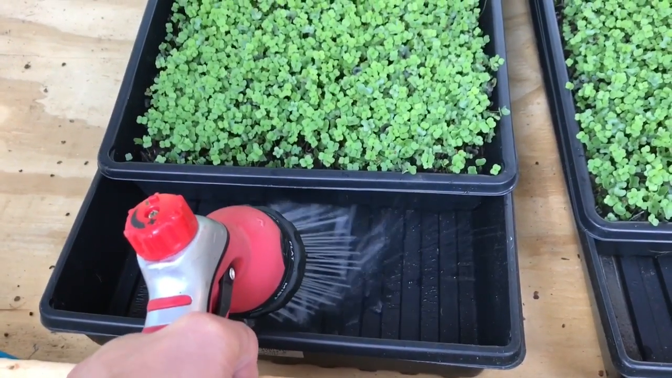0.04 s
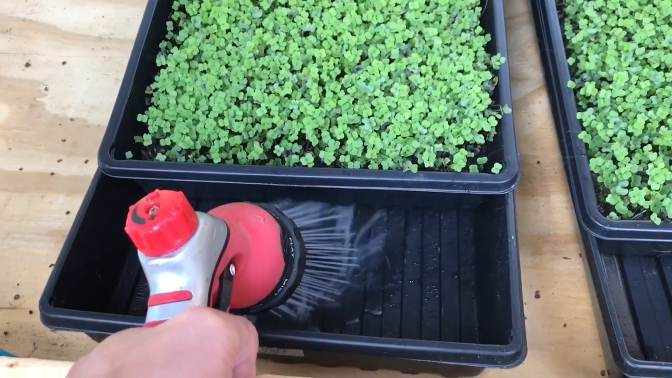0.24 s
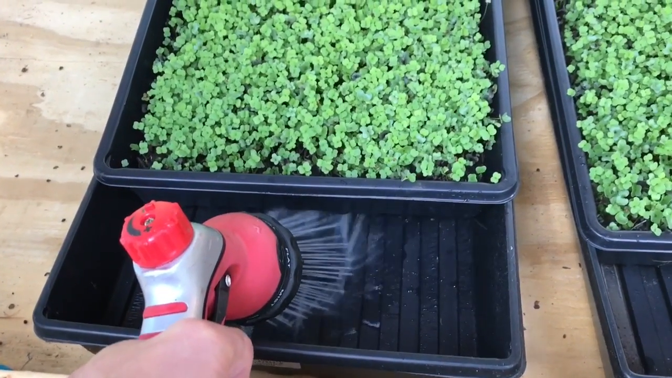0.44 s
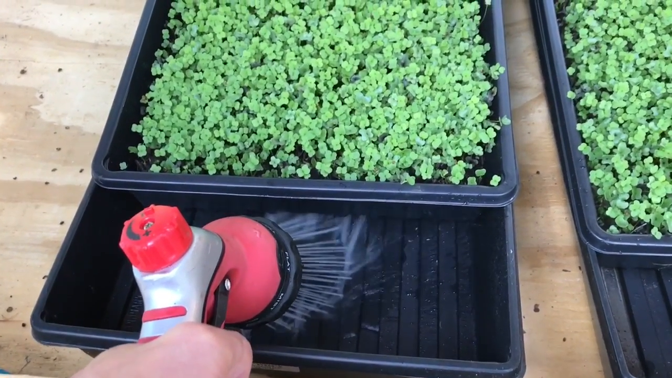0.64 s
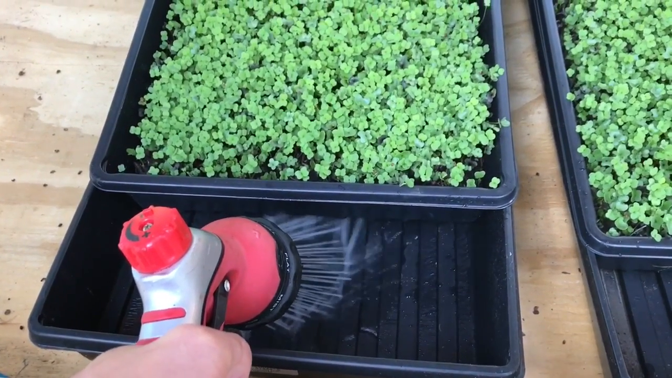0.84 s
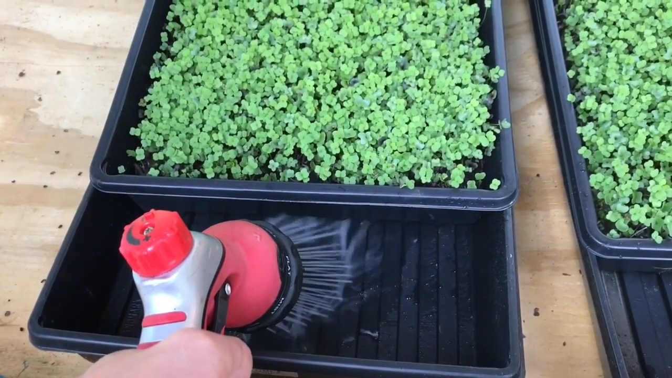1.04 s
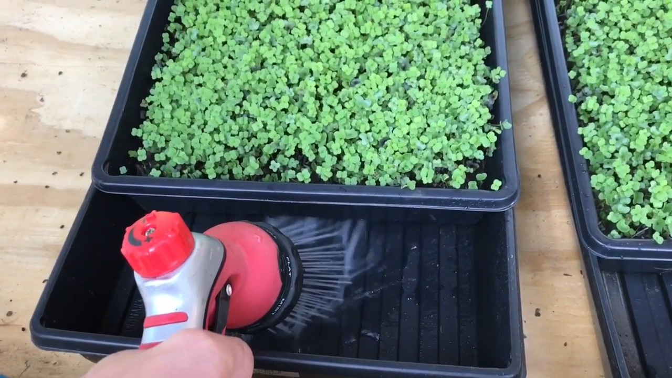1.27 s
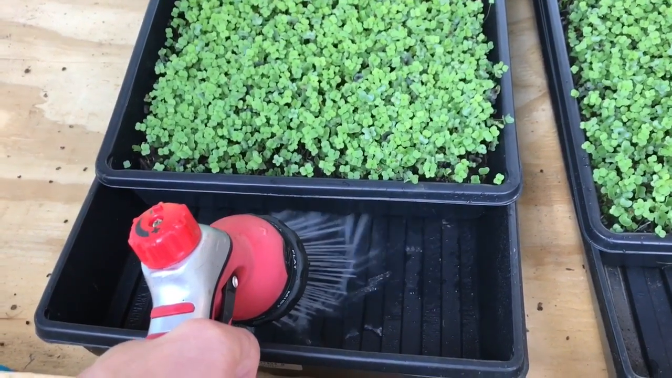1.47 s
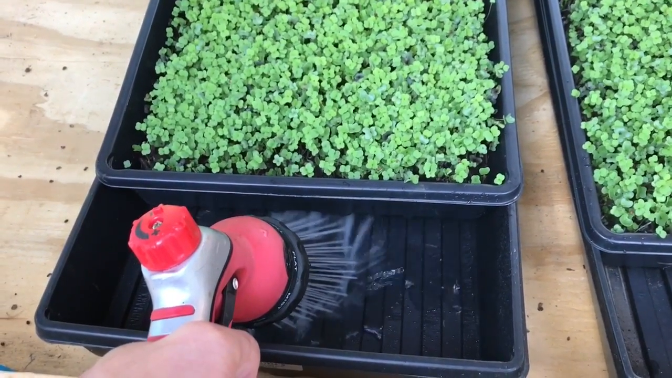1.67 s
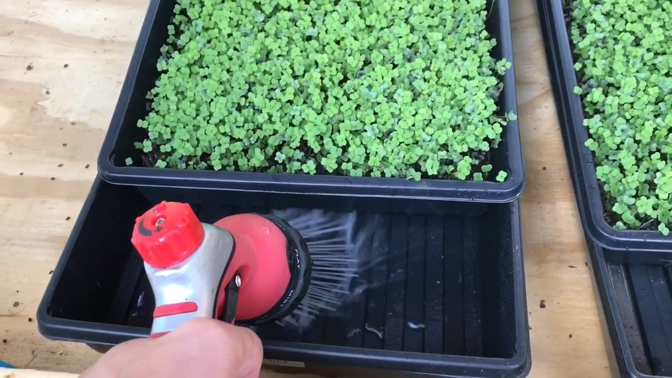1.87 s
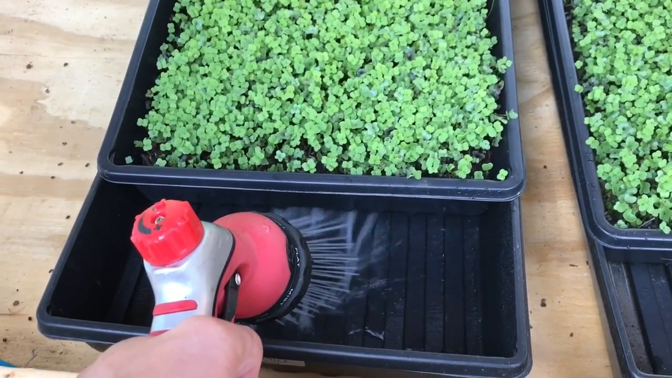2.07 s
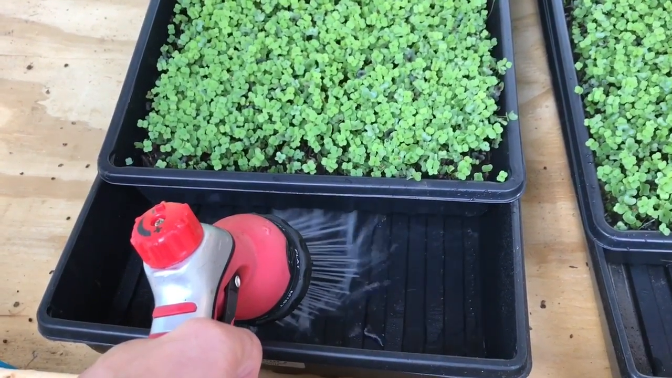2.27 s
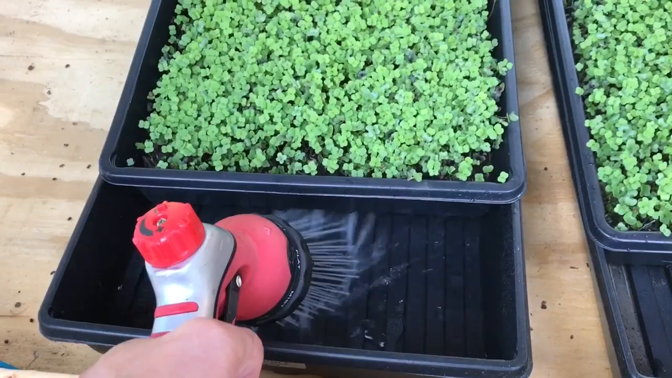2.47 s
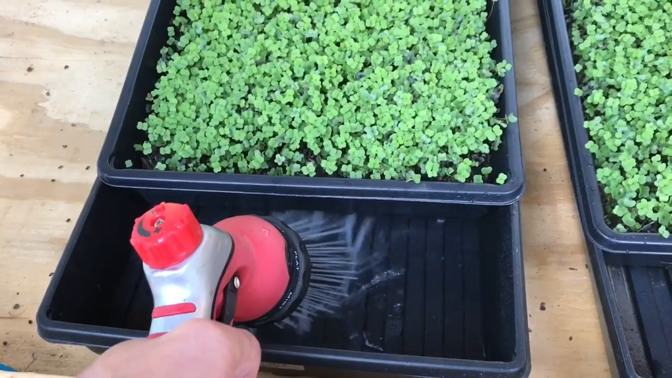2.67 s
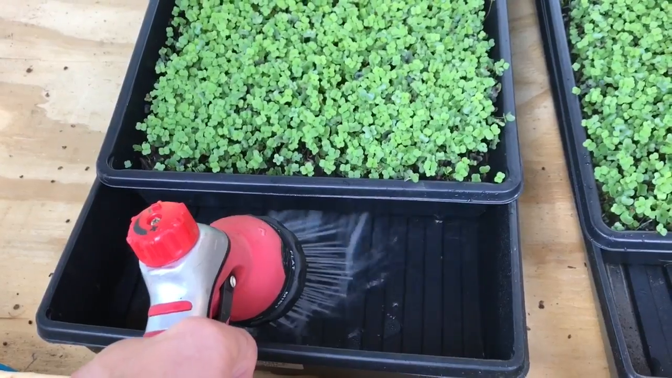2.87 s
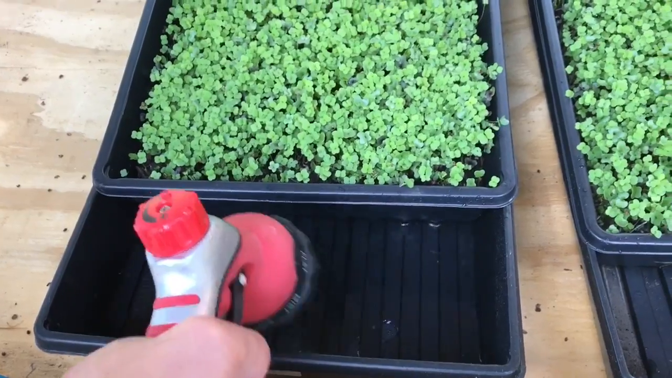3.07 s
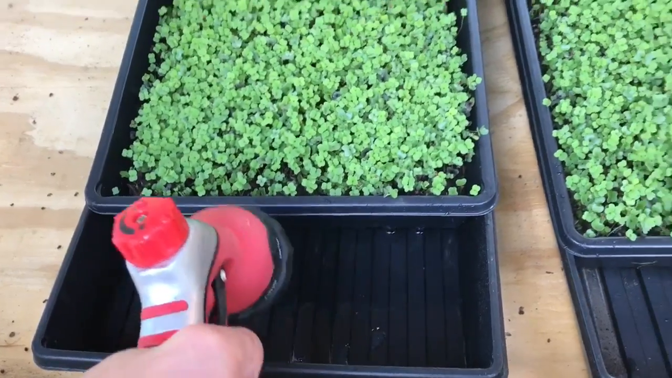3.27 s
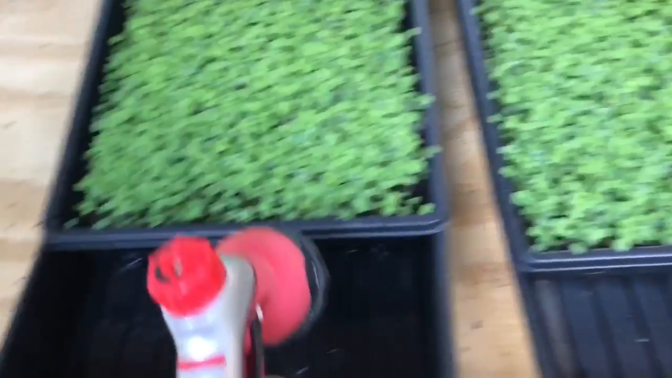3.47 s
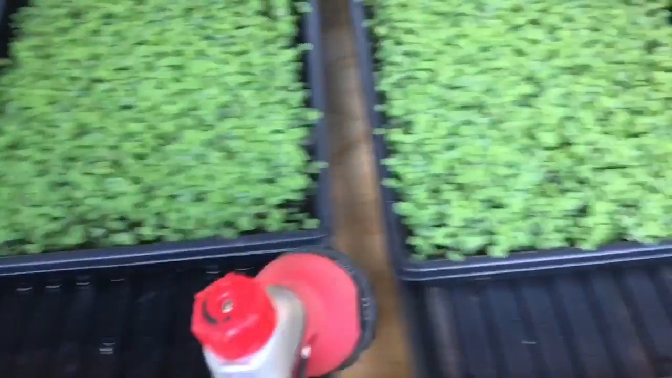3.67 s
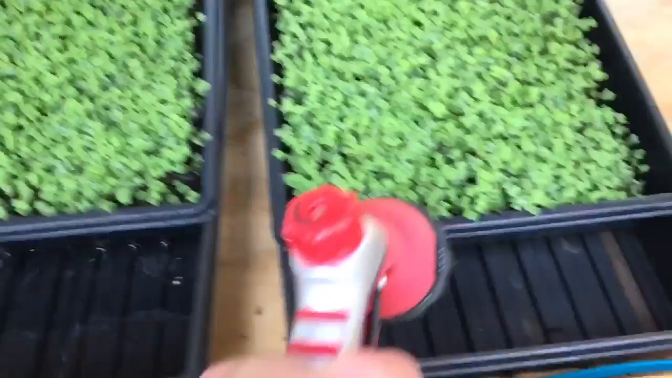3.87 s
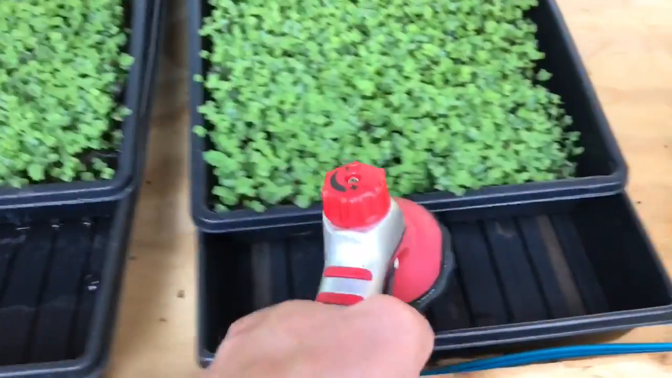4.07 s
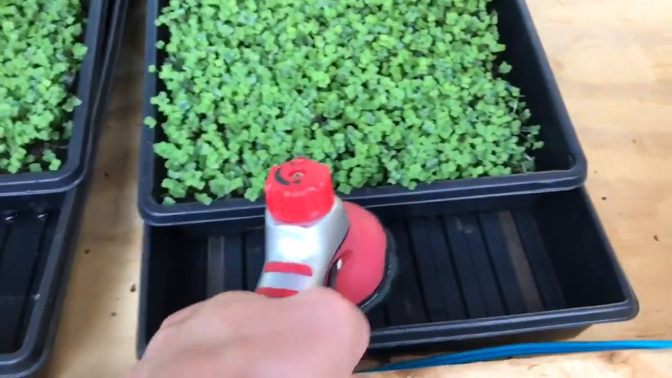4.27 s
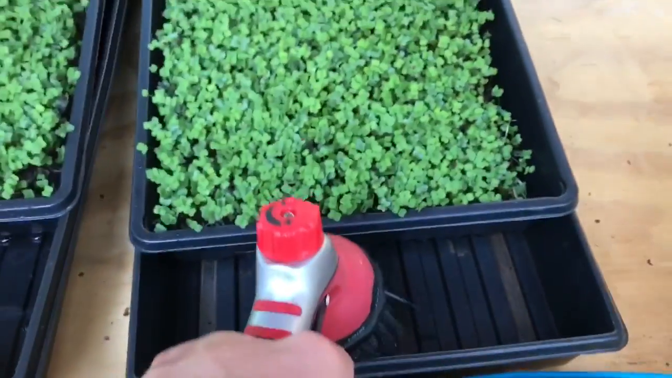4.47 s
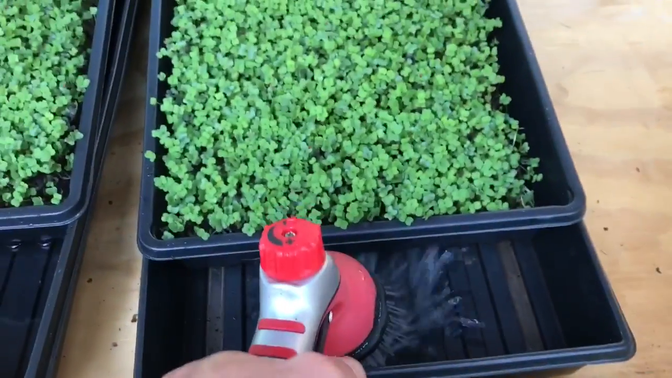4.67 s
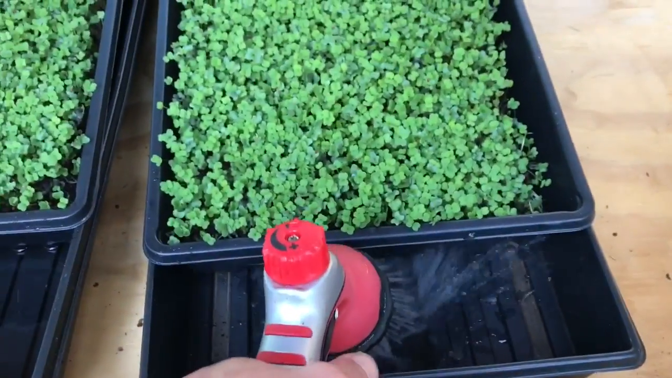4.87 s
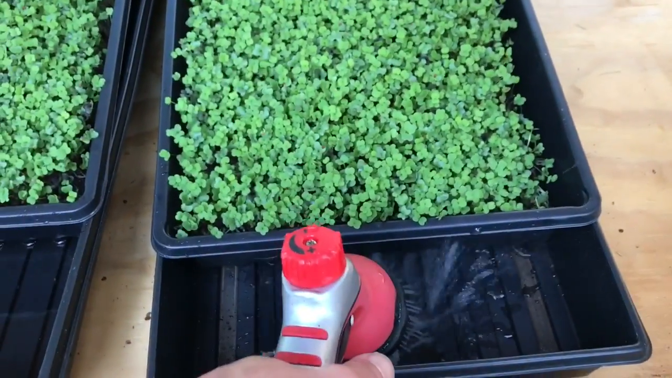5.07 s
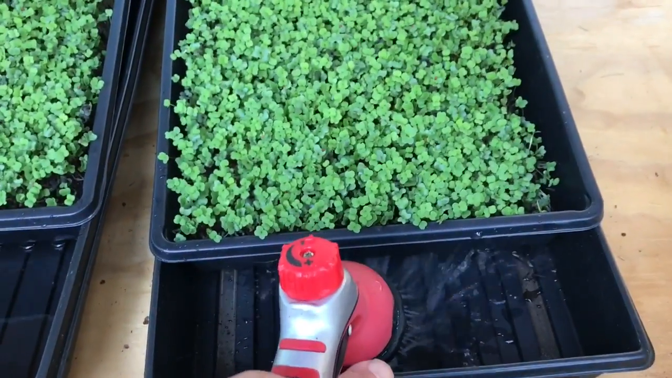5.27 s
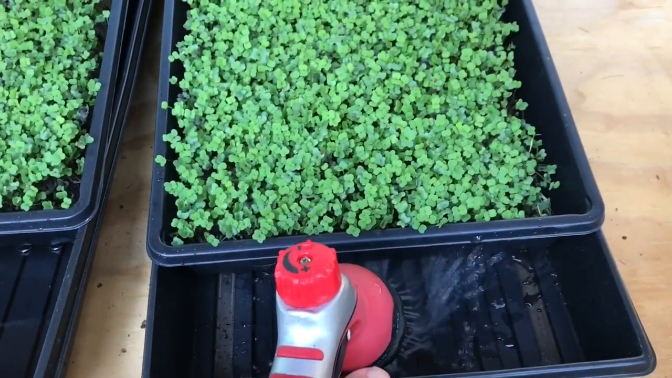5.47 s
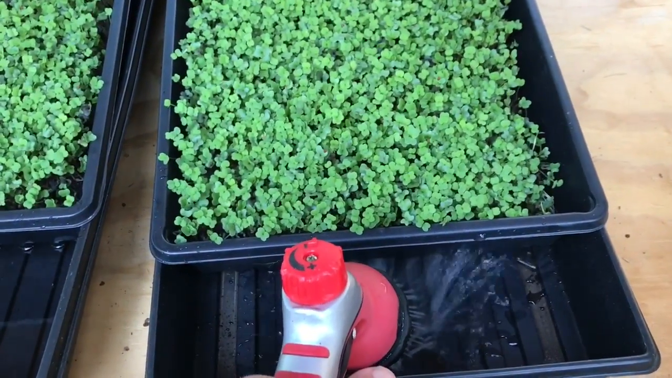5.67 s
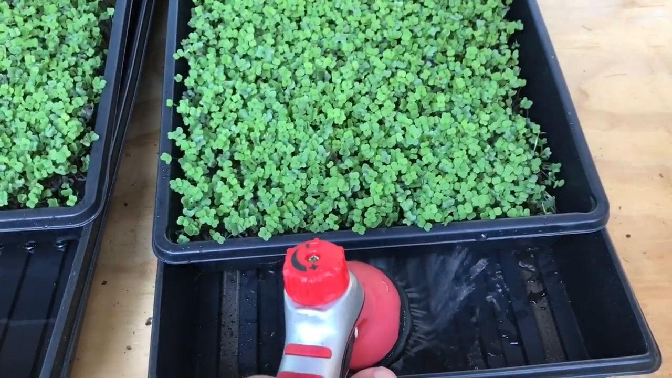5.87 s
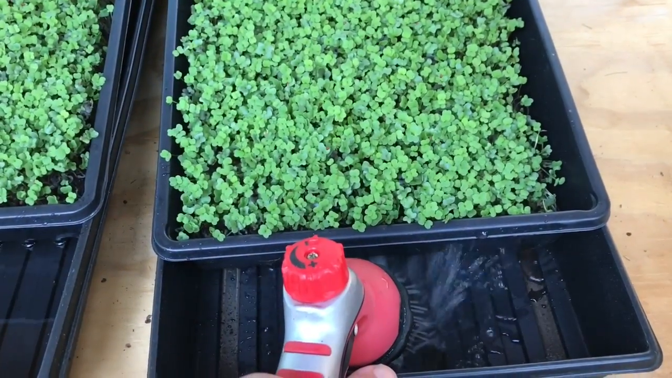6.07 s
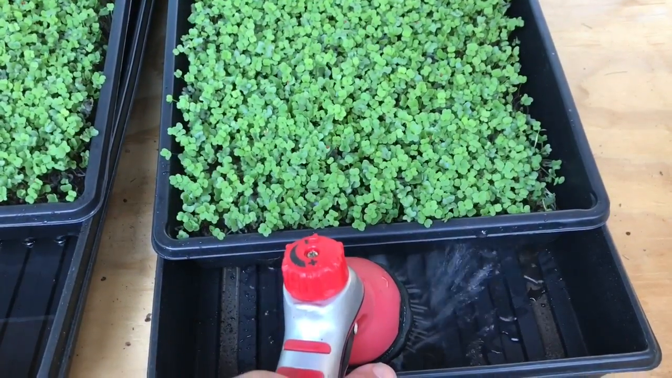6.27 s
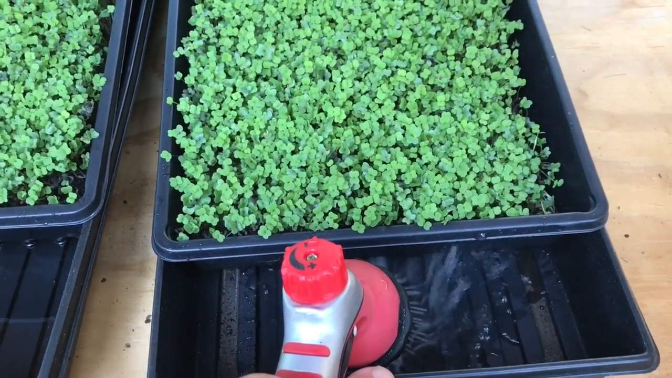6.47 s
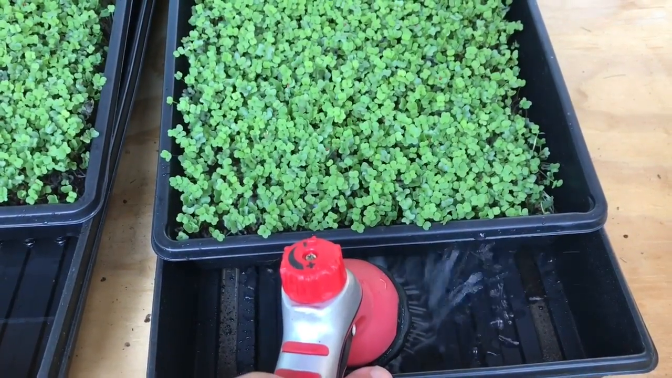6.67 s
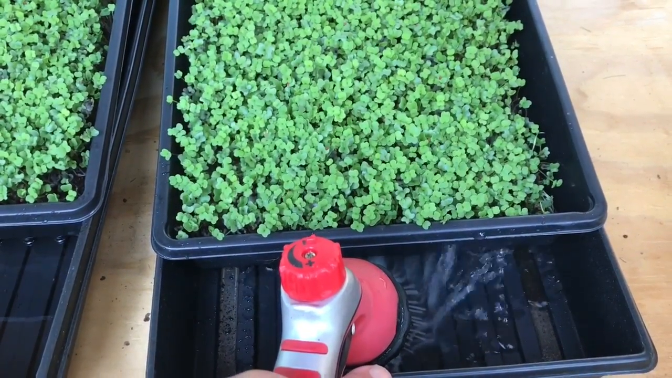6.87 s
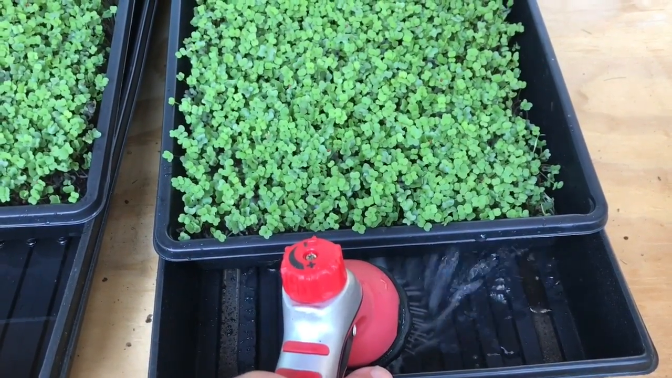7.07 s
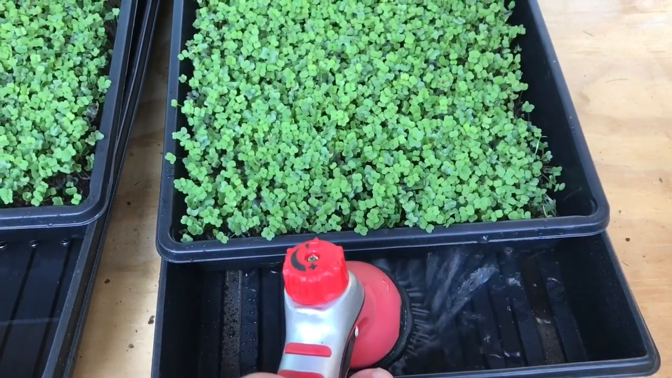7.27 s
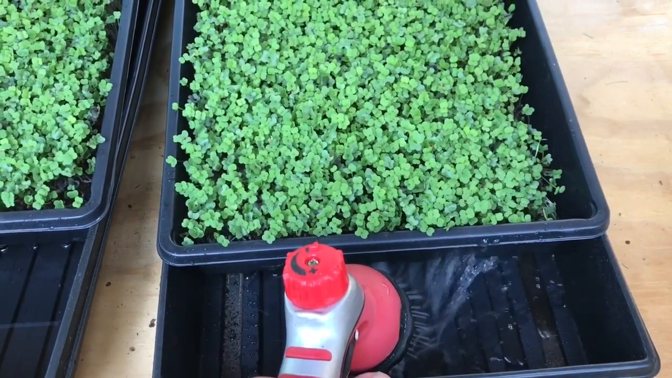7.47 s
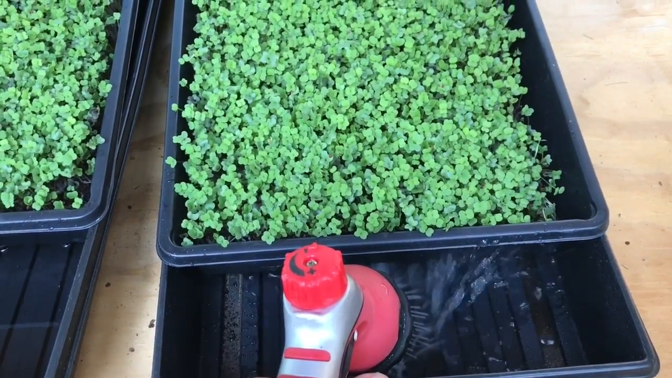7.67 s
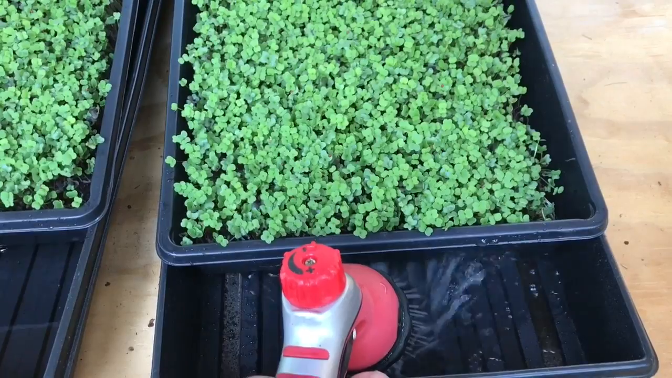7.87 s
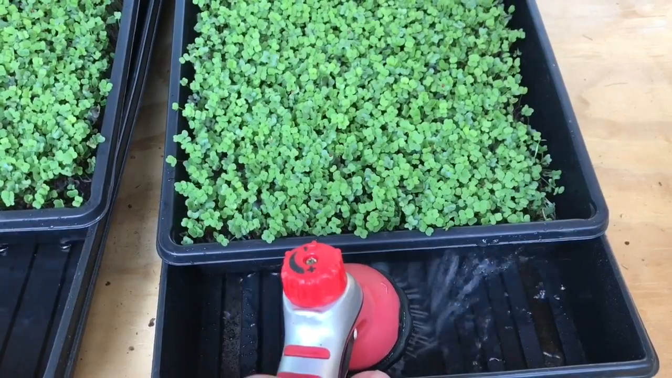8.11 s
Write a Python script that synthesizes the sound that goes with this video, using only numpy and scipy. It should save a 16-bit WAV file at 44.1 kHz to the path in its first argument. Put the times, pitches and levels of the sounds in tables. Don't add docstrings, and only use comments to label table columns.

```python
import sys
import numpy as np
from scipy import signal
from scipy.fft import rfft, irfft, next_fast_len
from scipy.io import wavfile
from scipy.ndimage import uniform_filter1d, map_coordinates

SR = 44100
rng = np.random.default_rng(int(sys.argv[2]) if len(sys.argv) > 2 else 0)


def rack_gain(trim_db):
    fader = np.asarray(trim_db, float)
    return 10 ** (fader / 20)


def int16_out(signal):
    q = np.round(np.clip(np.atleast_2d(signal).T, -1, 1) * 32767)
    wavfile.write(sys.argv[1], SR, q.astype(np.int16))


N = 358974

# f/Hz, level/(dB per Hz)
FIRST_COLOUR = [(200, -51.5), (330, -13), (560, -22), (850, -15), (1050, -5), (1500, -4.5), (2400, -13.5),
                (4200, -10.5), (5500, -12.5), (9000, -13.5), (15700, -14.5)]
SECOND_COLOUR = [(200, -28), (330, -16), (560, -20.5), (850, -15.5), (1050, -5.5), (1500, -6), (2400, -3.5),
                 (4200, -2), (5500, -8.5), (9000, -11.5), (15700, -14)]
# f/Hz, width/Hz, lift/dB
FIRST_MODES = [(470, 32, 5), (690, 110, 5), (1137, 44, 4), (1295, 48, 5), (1333, 100, 5.5),
               (1646, 150, 5.5), (1864, 100, 8), (2265, 43, 3.5), (2800, 120, 1), (3095, 100, 4),
               (3980, 340, -3), (6300, 300, 1), (8140, 300, 2.5), (13200, 600, 2.5), (9800, 400, 1),
               (11300, 500, 1.5)]
SECOND_MODES = [(482, 23, 5.3), (682, 74, 6.6), (1030, 60, 1.8), (1317, 62, 5.8), (1562, 54, 5.8),
                (2230, 210, 2.9), (2390, 37, 0.98), (3380, 330, 2.5), (3900, 200, 0.98), (5360, 250, 2.6),
                (7220, 360, 3.5), (9340, 700, 1.9), (12100, 1900, 2.8)]
# f/Hz, width/Hz, lift/dB
HOLLOWS = [(1200, 50, -3), (1996, 83, 2), (4920, 510, -5), (7780, 650, -3), (10370, 330, -7)]
LAYER_EDGES_HZ = [560, 2100, 4900]
# t/s, level/dB
FIRST_FLOW = [
    (0, 0.5),
    (0.45, 0.5),
    (0.8, -0.3),
    (1.9, 0),
    (2.8, -0.5),
    (3.04, -0.1),
    (3.08, -2.5),
    (3.115, -8),
    (3.155, -39),
]
SECOND_FLOW = [
    (4.575, -43),
    (4.615, -6.5),
    (4.67, 0),
    (4.75, 1.5),
    (4.9, 1.5),
    (5.02, 0.5),
    (5.3, -0.5),
    (5.75, 0),
    (8.15, -0.7),
]
# dry level/dB, growth/(dB per dB pressure), flooding loss/dB, flooding time/s, wander/dB
FIRST_LAYERS = [
    (-46, 1, 7.5, 0.41, 2),
    (-30, 0.65, -1.5, 1.9, 0.3),
    (-26.5, 0.96, 1, 1.7, 0.44),
    (-27.5, 0.84, 0.3, 1.5, -0.2),
]
SECOND_LAYERS = [
    (-47.5, 0.34, 8.7, 0.56, 1.9),
    (-29.5, 0.78, 4.14, 1.7, 0.55),
    (-28.5, 1.1, 1.1, 0.53, 0.4),
    (-27, 1.2, 1.14, 1.5, 0.33),
]
WANDER_PER_S = 22
# t/s, half length/s, ring lift/dB
STRAYS = [
    (1.1, .3, -1.5),
    (2.6, 0.17, 0),
    (5.85, 0.11, 1),
]

FAN_HZ, AIR_DB = 32.35, -52
# multiple of shaft rate, level/dB
BLADES = [(1, -90), (2, -83), (3, -59.5), (4, -64.5), (5, -57.5), (7, -72), (9, -65)]
# f/Hz, width/Hz, level/dB
HUMS = [(58, 10, -70), (73.6, 7.4, -65.5), (151.5, 7.4, -64.5), (210.3, 4, -65), (229, 4.8, -72.5),
        (358, 7.9, -69), (448, 11, -62.5), (1000, 26, -62)]
# f/Hz, level/(dB per Hz)
AIR = [(22, -38), (32, -19), (58, -9), (110, -2.5), (180, 0), (240, -1.5), (300, -14), (400, -6),
       (560, -11.5), (800, -9.5), (1000, -7), (1300, -14), (3300, -19), (6500, -29), (15700, -45)]
# t/s, level/dB
FAN_NEAR = [
    (0, -52.5),
    (1.2, -52),
    (2.8, -51.5),
    (3.4, -49),
    (3.9, -50.5),
    (4.8, -52.5),
    (6, -51),
    (8.14, -52.5),
]
# t/s, level/dB
HANDLING = [
    (3.1, -68),
    (3.42, -71),
    (3.51, -63),
    (3.84, -62),
    (3.95, -58),
    (4.06, -70),
    (4.59, -65),
    (4.7, -71),
]

# t/s, level/dB
DRAIN = [
    (3.14, -55),
    (3.2, -58),
    (3.34, -62),
    (3.64, -55),
    (3.8, -63),
    (3.95, -60),
    (4.06, -74),
    (4.51, -80),
]
DRAIN_LOW_DB = -8
# f/Hz, level/(dB per Hz)
RUSTLE = [(530, -12), (900, 0), (967, -7), (1130, 1), (1520, -10), (1680, -6), (3050, -7), (15700, -17)]
# t/s, peak/dB, dull part re crackle/dB, rise/s, fall/s
DRAGS = [(3.14, -60, 12, .01, .025), (3.296, -58, 0, .008, .05), (3.398, -45, 0.5, 0.05, 0.075),
         (3.55, -53, -1, 0.046, .04), (3.615, -59, 6, .04, .015), (3.66, -60, 2, .015, .008),
         (3.715, -54, -6, .03, .02), (3.728, -60, 9, .04, .015), (3.77, -66, 5, .03, .06),
         (3.866, -57, 4, .02, .02), (3.902, -63, 5, .012, .06), (4.005, -65, 6, .04, .012)]
DRAG_EDGE_DB = 10.5
# t/s, peak/dB, f/Hz, width/Hz, t60/s
TICKS = [(3.5711, -27, 2800, 4500, .004), (3.5716, -37, 2500, 4000, .03), (3.5776, -24, 2700, 4200, .005),
         (3.5795, -33, 1700, 1500, .018), (3.5575, -40, 1100, 900, .02), (3.5777, -40, 12500, 4000, .005),
         (3.5825, -38, 5000, 6000, .01), (3.594, -38, 900, 700, .02), (3.728, -42, 3500, 5000, .015),
         (3.865, -47, 9000, 9000, .03), (3.899, -41, 1500, 1800, .015), (4.055, -56, 9800, 2500, .008),
         (4.101, -57, 13500, 5000, .006), (4.121, -61, 11000, 5000, .006), (4.191, -56, 13000, 5000, .035),
         (4.227, -52, 8500, 3500, .035), (4.244, -59, 7200, 1500, .015), (4.337, -55, 6200, 2500, .01),
         (4.369, -58, 12500, 6000, .015), (4.482, -56, 11000, 9000, .008), (4.598, -36, 8600, 350, .08),
         (4.62, -24, 10000, 3500, .01), (4.599, -33, 10500, 9000, .04)]

# f/Hz, width/Hz, lift/dB
NOZZLE = [(2000, 200, 12), (2750, 200, 7), (3600, 220, 11), (7500, 500, 5), (9000, 400, 4), (11500, 600, 4),
          (13200, 600, 4)]
# t/s, hiss/dB, whistle/dB
SPURT = [
    (4.5, -75, -80),
    (4.525, -58, -68),
    (4.537, -53, -47),
    (4.544, -53, -60),
    (4.551, -53, -54),
    (4.562, -54, -66),
    (4.585, -50, -66),
    (4.61, -60, -80),
]
# f/Hz, width/Hz
WHISTLE = (4550, 240)
# t/s, f/Hz, level/dB
GROOVES = [
    (4.7, 3150, -33.5),
    (4.8, 3400, -30),
    (4.89, 3950, -31),
    (4.89, 5760, -33),
]
GROOVE_WIDTH_HZ, GROOVE_S = 550, 0.062

TOP_HZ = 15800
SWAPS_S = [0.104, 0.642, 1.037, 1.313, 1.498, 1.57, 2.333, 2.497, 2.613, 2.891, 4.818, 5.076, 5.398, 5.654,
           5.727, 5.889, 5.911, 6.63, 6.957, 7.444, 7.561, 7.791, 8.025]
SWAP_FROM_HZ, SWAP_BAND_HZ, SWAP_SHARE = 4220, 1450, 0.18


def unit(x):
    return x / np.sqrt(np.mean(x ** 2) + 1e-20)


def along(points, hz):
    f, v = np.transpose(points)
    return np.interp(np.log(hz + 1), np.log(f + 1), v)


def bumps(modes, hz):
    return sum(db / (1 + (2 * (hz - c) / w) ** 2) for c, w, db in modes)


def curves(rows):
    s, *cols = np.transpose(rows)
    return [np.interp(np.arange(N) / SR, s, c, left=-120, right=-120) for c in cols]


def wobble(rate):
    knots = rng.standard_normal(int(N * rate / SR) + 4)
    return map_coordinates(knots, [np.arange(N) * rate / SR])


def filtered(x, gain):
    m = 2 * next_fast_len(N // 2 + SR // 4)
    cepstrum = irfft(np.log(gain(np.fft.rfftfreq(m, 1 / SR)) + 1e-6), m)
    cepstrum[1:m // 2] *= 2
    cepstrum[m // 2 + 1:] = 0
    return irfft(rfft(x, m) * np.exp(rfft(cepstrum)), m)[:N]


def resonated(x, hz, width_hz):
    return signal.lfilter(*signal.iirpeak(hz, hz / width_hz, SR), x)


def patchy(x, patch_db, bins, frames, size):
    z = signal.stft(x, nperseg=size)[2]
    field = uniform_filter1d(rng.standard_normal(z.shape), bins, 0)
    field = uniform_filter1d(field, frames, 1)
    return signal.istft(z * rack_gain(patch_db * unit(field)), nperseg=size)[1][:N]


def drops(rate, spread_db, share):
    hit = rng.random(N) < rate / SR
    blows = hit * rng.standard_normal(N) * rack_gain(spread_db * rng.exponential(size=N))
    return np.sqrt(share) * unit(blows) + np.sqrt(1 - share) * rng.standard_normal(N)


def bubbles(rate, mid_hz, spread, cycles):
    count = int(rate * N / SR)
    start = (rng.random((count, 1)) * N).astype(int)
    hz = np.clip(mid_hz * np.exp(spread * rng.standard_normal((count, 1))), 300, 15000)
    t = np.arange(192) / SR
    life = hz * t / cycles
    tone = np.sin(2 * np.pi * hz * t * (1 + 0.071 * life)) * life * np.exp(-3 * life)
    at = start + np.arange(len(t))
    return unit(np.bincount(at.ravel(), (tone * hz).ravel(), N + len(t))[:N])


def jets():
    froth = bubbles(rate=1500, mid_hz=4990, spread=0.752, cycles=13.2)
    water = drops(rate=5000, spread_db=0.2, share=0.23) + rack_gain(-10.5) * froth
    water = patchy(water, patch_db=0.17, bins=4, frames=5, size=512)
    return patchy(water, patch_db=1.5, bins=3, frames=9, size=2048)


def layers(flow, table):
    pressure_db, = curves(flow)
    t = np.arange(N) / SR
    wet_s = np.clip(t - flow[0][0], 0, None)
    levels = []
    for dry_db, grows, lost_db, flood_s, wander_db in table:
        knots = rng.standard_normal(400)
        wander = wander_db * np.interp(t * WANDER_PER_S, np.arange(len(knots)), knots)
        flooding_db = lost_db * (1 - np.exp(-wet_s / flood_s))
        level_db = dry_db + grows * pressure_db - flooding_db + wander
        levels.append(np.where(pressure_db > -100, level_db, -120))
    return levels


def spray(water, flow, table, colour, modes):
    t, hz = np.arange(N) / SR, np.fft.rfftfreq(N, 1 / SR)
    levels_db = layers(flow, table)
    for s, half_s, db in STRAYS:
        levels_db[1] = levels_db[1] + db * np.exp(-.5 * ((t - s) / half_s) ** 2)
    flutter_db = 0.13 * wobble(11) + 0.14 * wobble(35)
    tray = lambda hz: rack_gain(along(colour, hz) + bumps(modes, hz) + bumps(HOLLOWS, hz))
    struck = rfft(filtered(water, tray))
    above = [1 / (1 + (edge / (hz + 1)) ** 12) for edge in LAYER_EDGES_HZ]
    shares = [1 - above[0], above[0] - above[1], above[1] - above[2], above[2]]
    parts = [unit(irfft(struck * share, N)) for share in shares]
    return rack_gain(flutter_db) * sum(rack_gain(db) * part for db, part in zip(levels_db, parts))


def fan():
    turn = 2 * np.pi * np.cumsum(FAN_HZ * (1 + 0.0021 * wobble(1.537))) / SR
    blades = sum(rack_gain(db + 1.4 * wobble(4.07)) * np.sqrt(2) * np.sin(k * turn) for k, db in BLADES)
    hums = sum(rack_gain(db) * unit(resonated(rng.standard_normal(N), hz, w)) for hz, w, db in HUMS)
    air = filtered(rng.standard_normal(N), lambda hz: rack_gain(along(AIR, hz) + bumps(HOLLOWS, hz)))
    near_db = curves(FAN_NEAR)[0] + 51
    air_db = AIR_DB + .5 * near_db + 0.98 * np.sin(turn)
    return rack_gain(near_db) * (blades + hums) + rack_gain(air_db) * unit(air)


def handling():
    rumble = filtered(rng.standard_normal(N), lambda hz: (hz / 50) ** 3 / (1 + (hz / 50) ** 6))
    return rack_gain(curves(HANDLING)[0] - 2) * unit(rumble)


def dribble():
    t = np.arange(0, N, 32) / SR
    drain = rack_gain(curves(DRAIN)[0][::32])
    low_power, high_power = (rack_gain(DRAIN_LOW_DB) * drain) ** 2, drain ** 2
    for s, db, dull_db, rise_s, fall_s in DRAGS:
        drag = rack_gain(db - DRAG_EDGE_DB * np.maximum((s - t) / rise_s, (t - s) / fall_s))
        low_power = low_power + (drag * rack_gain(dull_db)) ** 2
        high_power = high_power + drag ** 2
    colour = lambda hz: rack_gain(along(RUSTLE, hz) + bumps(HOLLOWS, hz))
    grit = patchy(drops(rate=760, spread_db=0, share=0.15), patch_db=1.5, bins=10, frames=3, size=512)
    low = filtered(grit, lambda hz: colour(hz) / (1 + (hz / 4800) ** 6))
    high = filtered(grit, lambda hz: colour(hz) / (1 + (4800 / (hz + 1)) ** 6))
    parts = [(low_power, low), (high_power, high)]
    return sum(np.interp(np.arange(N) / SR, t, np.sqrt(power)) * unit(part) for power, part in parts)


def ticks():
    out, t = np.zeros(N + SR), np.arange(SR // 10) / SR
    for s, db, hz, width_hz, t60_s in TICKS:
        burst = rng.standard_normal(len(t)) * rack_gain(-60 * t / t60_s)
        burst[0] = 3
        knock = resonated(resonated(burst, hz, width_hz), hz, width_hz)
        out[round(s * SR):][:len(t)] += rack_gain(db) * knock / np.abs(knock).max()
    return out[:N]


def valve():
    hiss_db, whistle_db = curves(SPURT)
    nozzle = lambda hz: rack_gain(bumps(NOZZLE, hz) + bumps(HOLLOWS, hz)) * hz / (hz + 1000)
    jet = filtered(rng.standard_normal(N), nozzle)
    whistle = resonated(resonated(rng.standard_normal(N), *WHISTLE), *WHISTLE)
    return rack_gain(hiss_db + 5.5) * unit(jet) + rack_gain(whistle_db) * unit(whistle)


def grooves():
    t = np.arange(N) / SR
    splash = drops(rate=4500, spread_db=1.0, share=0.3)
    opened = rack_gain(2 * np.minimum(curves(SECOND_FLOW)[0], 0))
    tones = 0
    for s, hz, db in GROOVES:
        swell = np.exp(-.5 * ((t - s) / GROOVE_S) ** 2)
        tones = tones + rack_gain(db) * swell * unit(resonated(splash, hz, GROOVE_WIDTH_HZ))
    return opened * tones


def scene():
    water = jets()
    trays = (spray(water, FIRST_FLOW, FIRST_LAYERS, FIRST_COLOUR, FIRST_MODES)
             + spray(water, SECOND_FLOW, SECOND_LAYERS, SECOND_COLOUR, SECOND_MODES))
    return np.tile(trays + fan() + handling() + dribble() + ticks() + valve() + grooves(), (2, 1))


def roll_off(x):
    return signal.sosfilt(signal.butter(12, 17020, fs=SR, output="sos"), x)


def record(dry):
    edge = np.clip((TOP_HZ - np.fft.rfftfreq(N, 1 / SR)) / 70, 0, 1)
    dry = irfft(rfft(dry) * np.sin(np.pi / 2 * edge) ** 2, N)
    out = dry.copy()
    size = 2048
    window = signal.windows.kaiser_bessel_derived(size, 4 * np.pi)
    hz = np.fft.rfftfreq(size, 1 / SR)
    slot = np.floor((hz - SWAP_FROM_HZ) / SWAP_BAND_HZ).astype(int)
    usable = (slot >= 0) & (hz < TOP_HZ)
    for s in SWAPS_S:
        chance = rng.random(slot.max() + 1)
        at = slice(round(s * SR) - size // 2, round(s * SR) + size // 2)
        inside = usable & (chance[slot] <= max(SWAP_SHARE, chance[slot[usable]].min()))
        band = irfft(rfft(dry[0, at]) * inside)
        noise = irfft(rfft(rng.standard_normal((2, size))) * inside * rack_gain(along(SECOND_COLOUR, hz)))
        out[:, at] += rack_gain(0.5) * window * unit(noise) * np.std(band) - window ** 2 * band * 0.71
    return roll_off(out)


dry = scene()
out = record(dry)
int16_out(out)
```